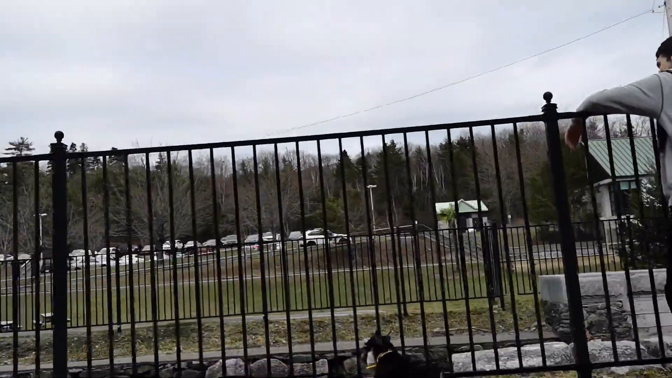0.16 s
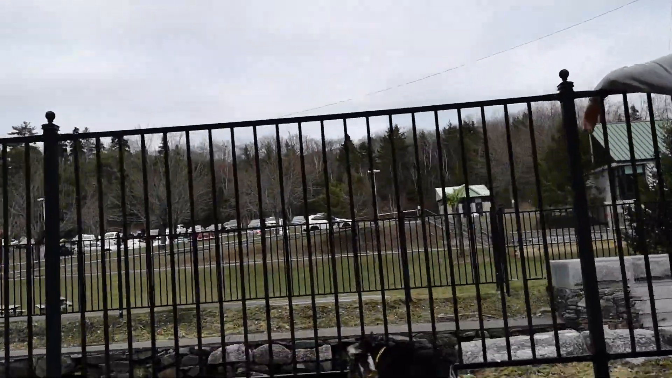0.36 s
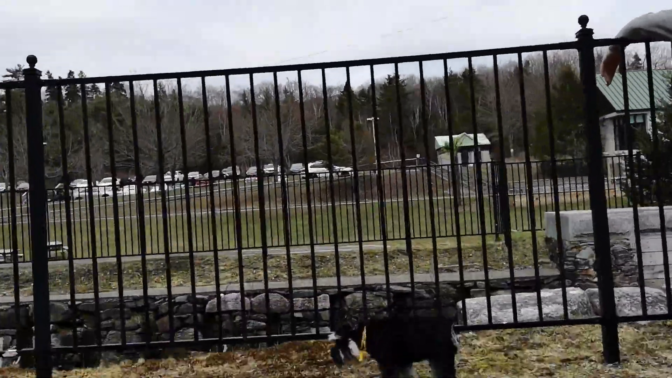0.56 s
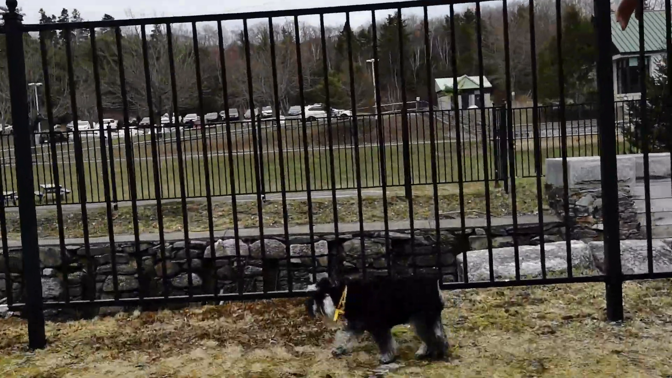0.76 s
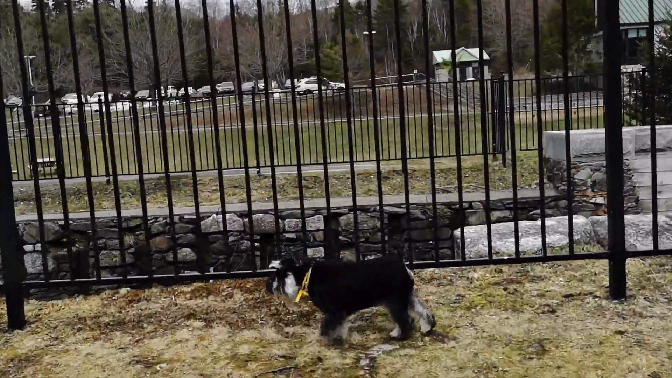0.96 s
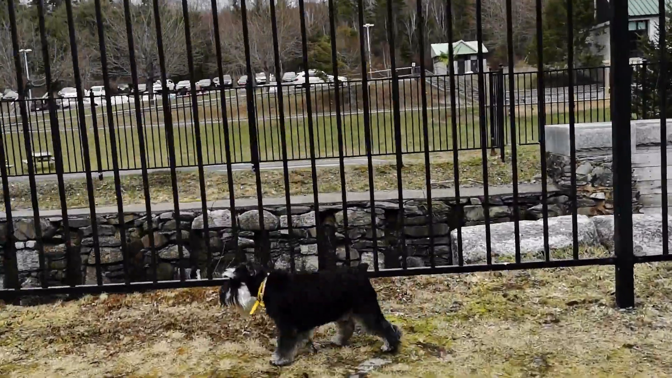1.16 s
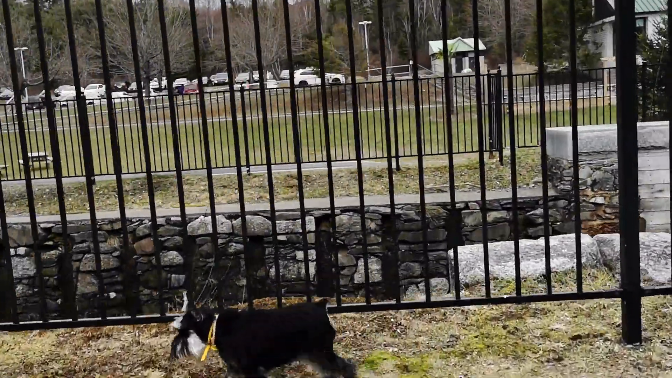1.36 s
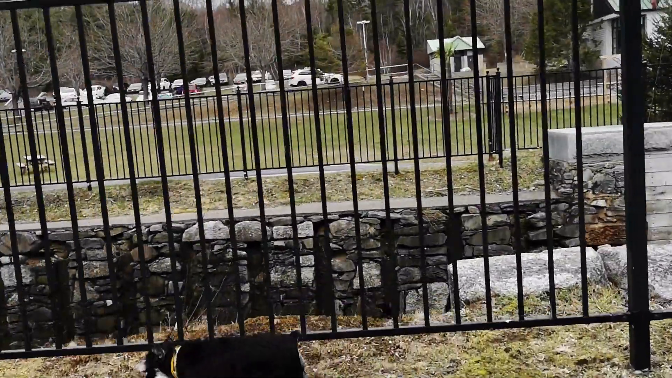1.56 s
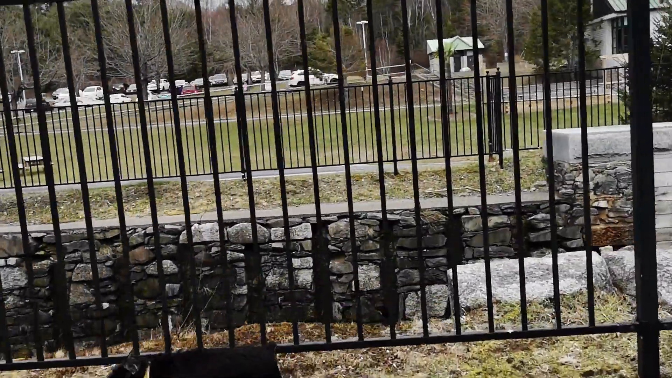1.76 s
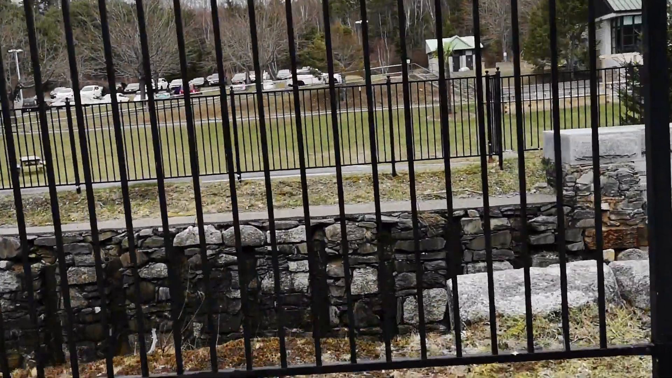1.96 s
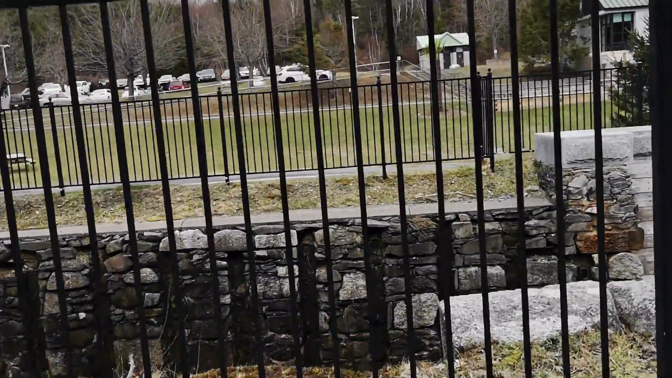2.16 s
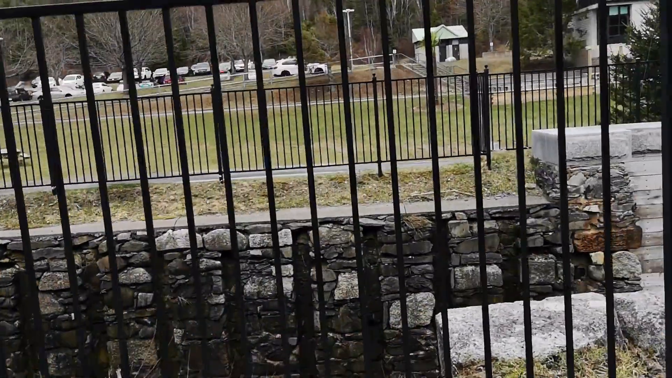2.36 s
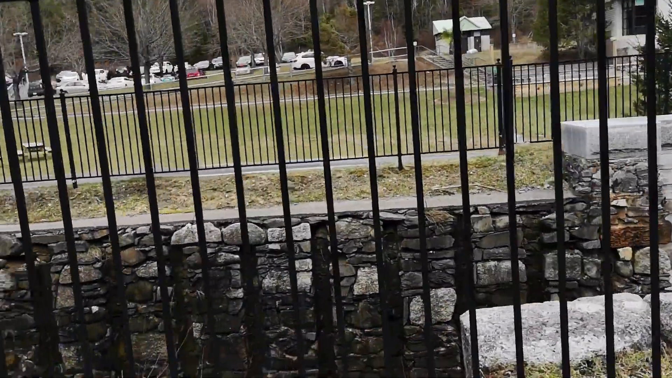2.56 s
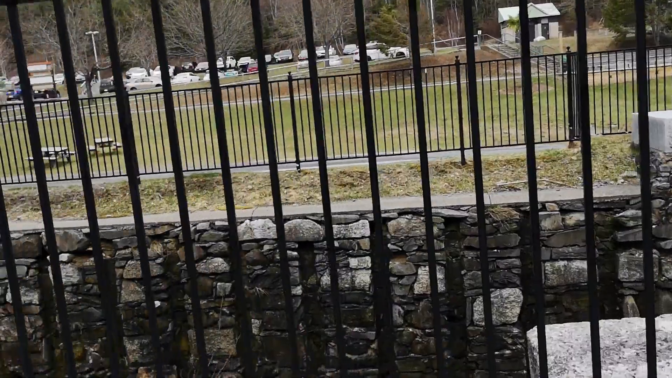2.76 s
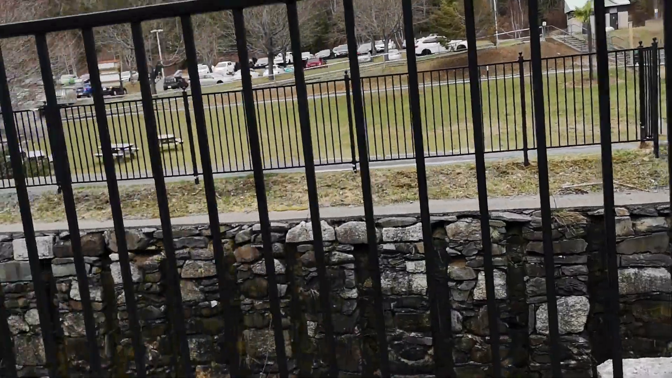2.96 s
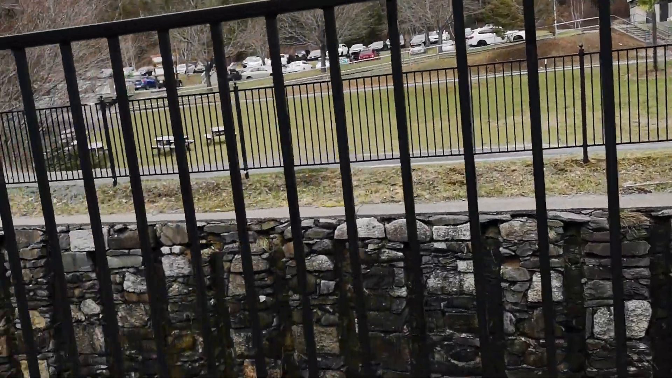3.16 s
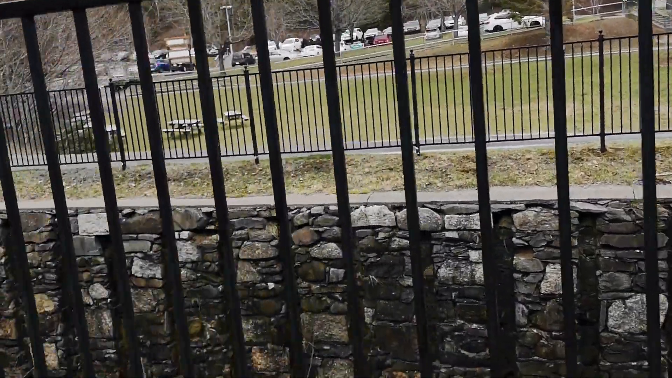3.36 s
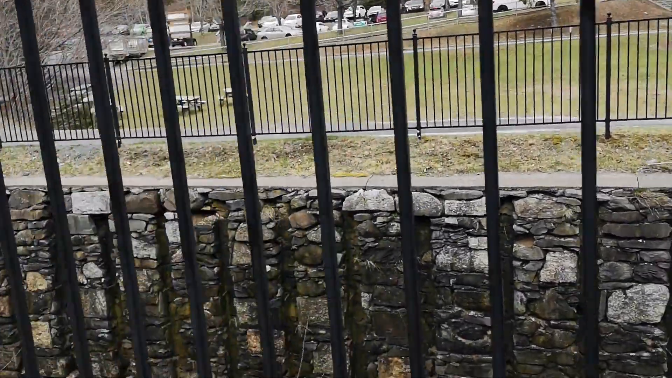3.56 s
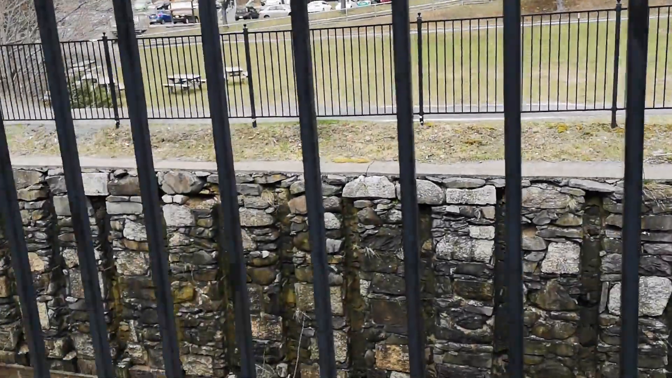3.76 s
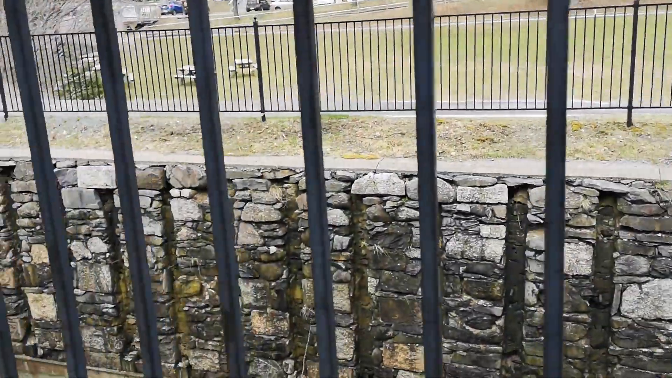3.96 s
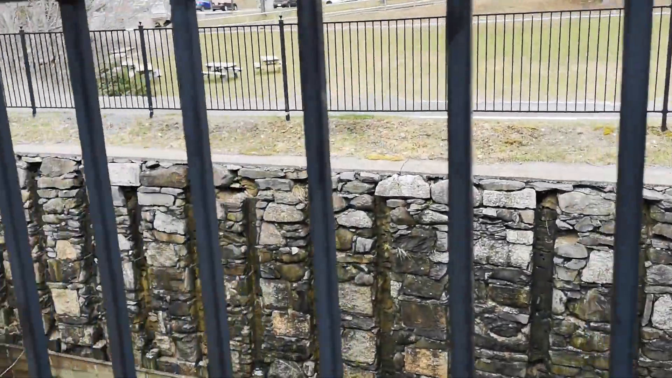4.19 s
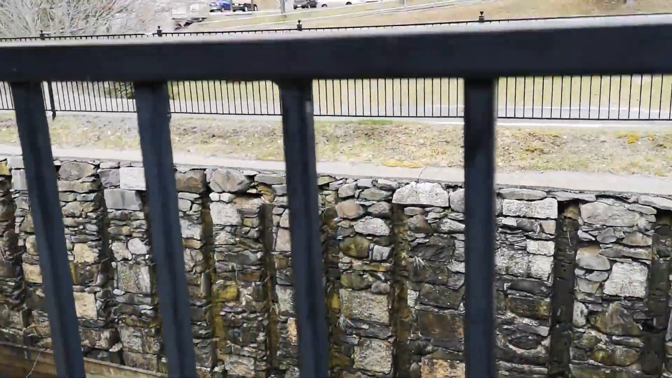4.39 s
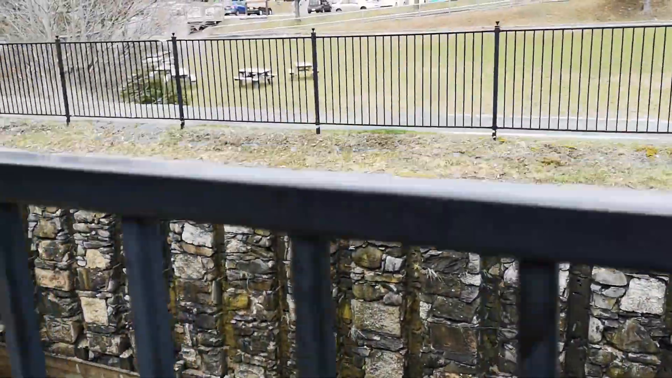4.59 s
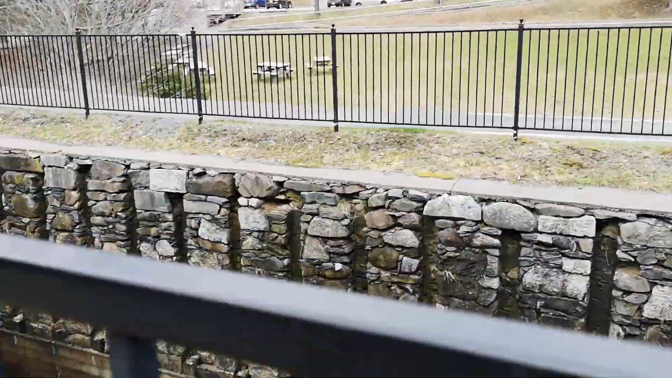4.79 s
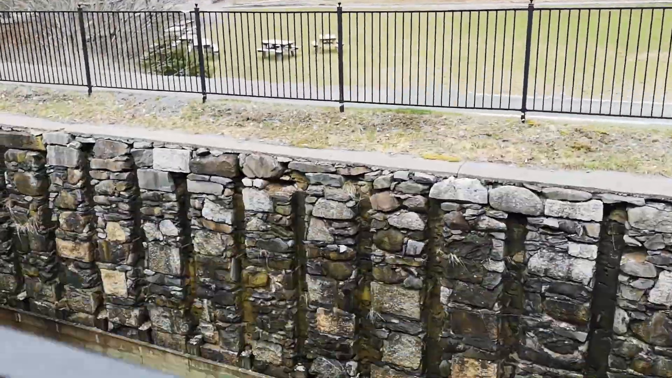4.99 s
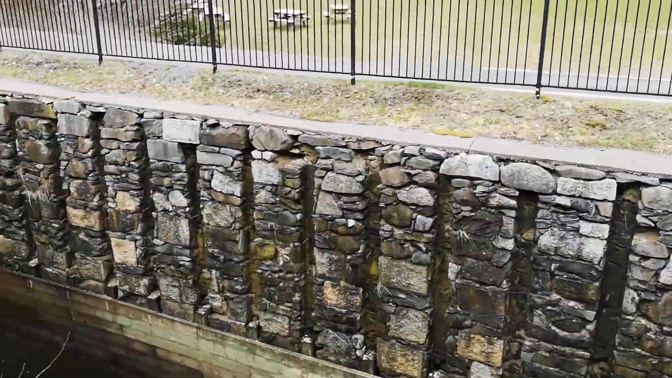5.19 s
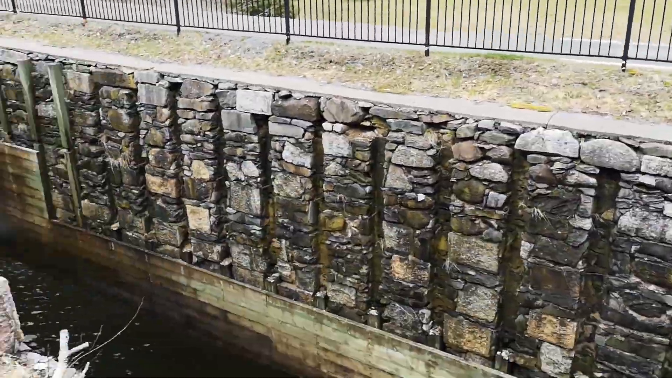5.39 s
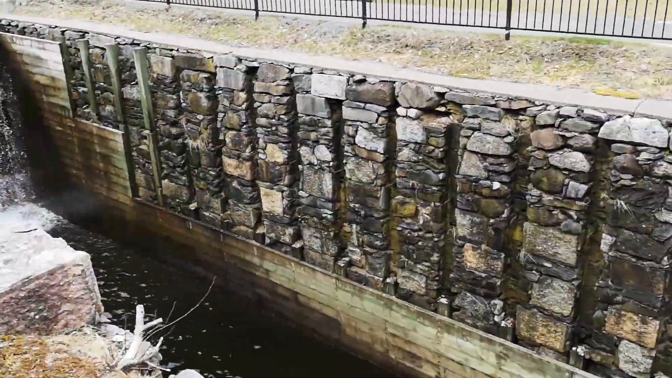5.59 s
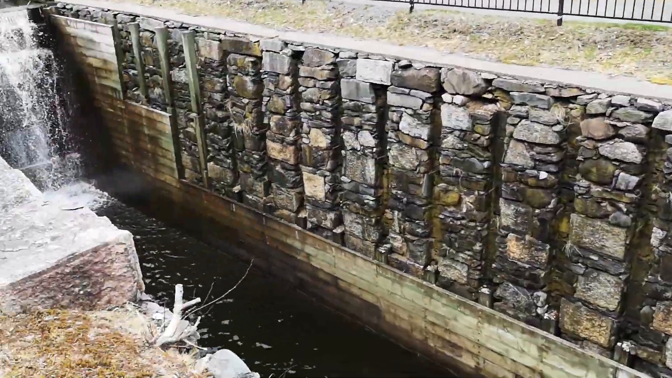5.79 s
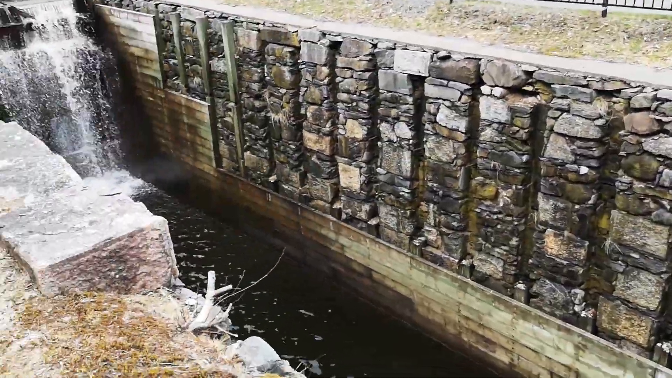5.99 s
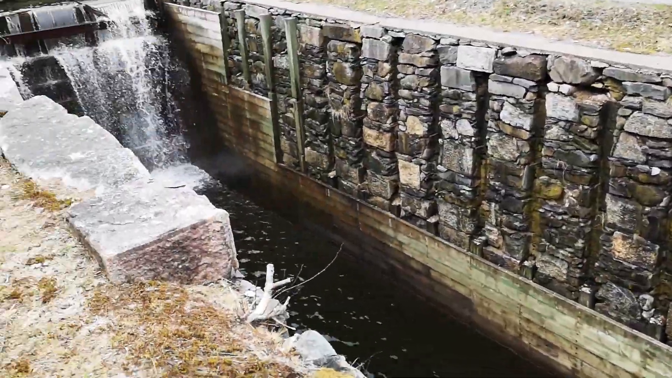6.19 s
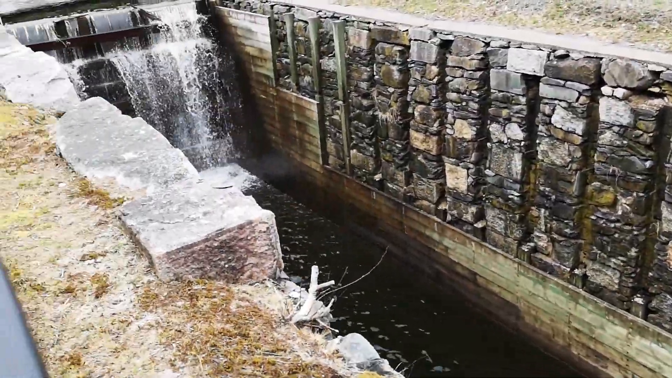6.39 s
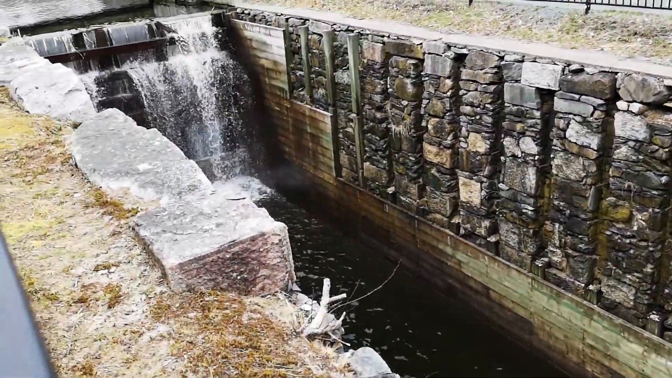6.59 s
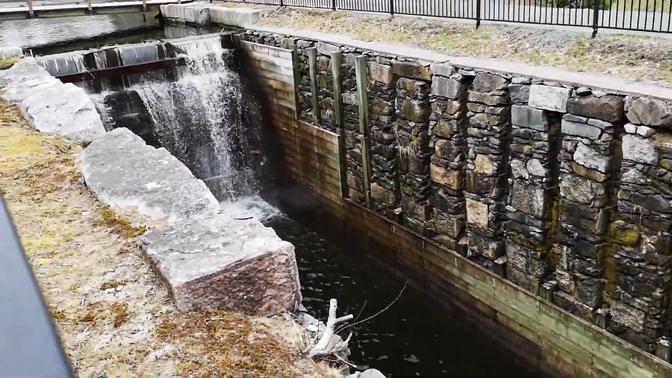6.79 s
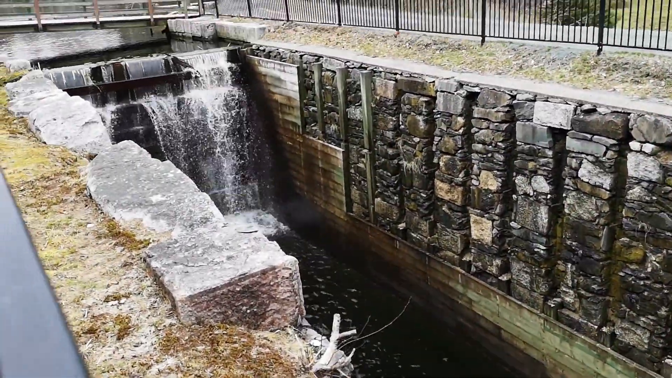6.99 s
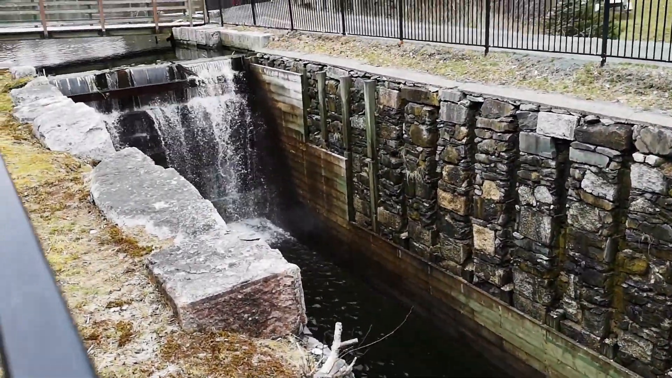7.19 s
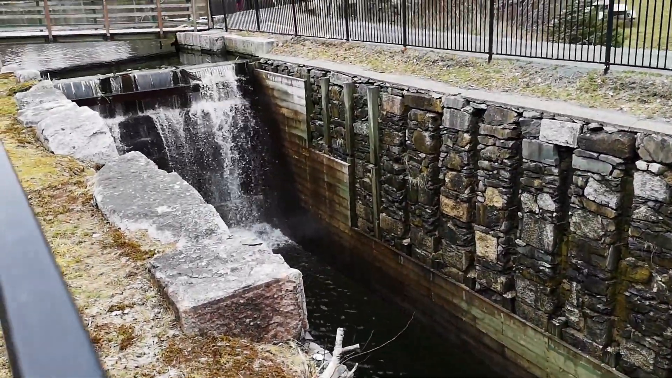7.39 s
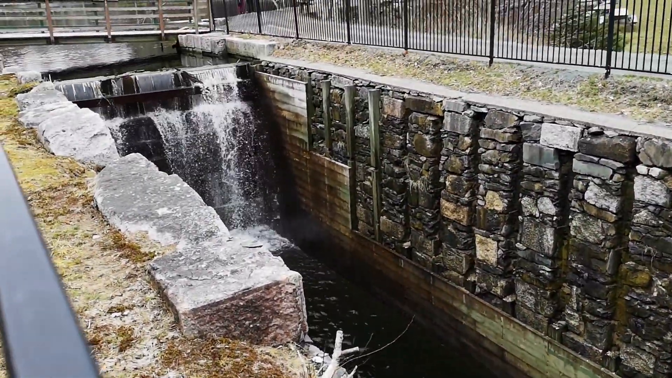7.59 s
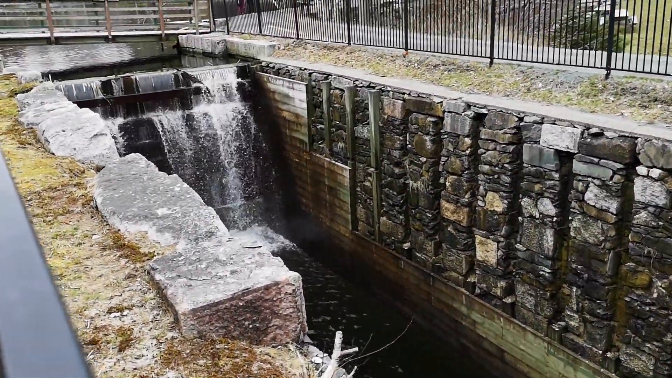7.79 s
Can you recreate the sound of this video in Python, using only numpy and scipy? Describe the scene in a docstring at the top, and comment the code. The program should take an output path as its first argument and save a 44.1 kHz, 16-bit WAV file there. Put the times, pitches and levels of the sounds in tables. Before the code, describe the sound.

A small waterfall pours continuously over a ledge into a stone-walled channel in an open park, heard in stereo from a moving handheld camera. At 0 s the rush is dulled by the bank and leans right; a short thin squeal, perhaps a bird, slides down within the first 0.2 s, off to the right, with a faint echo. A barely noticeable dull bump comes at 0.7 s. From 0 to 4 s the water steadily grows louder and clearer over a low plunging rumble. Around 4.4 s, passing the rail, the splash briefly takes on a coloured edge and moves towards the centre. By 4.8 s it is full, bright and hissing; a soft bump follows at 5.1 s. From about 6.2 to 7.4 s a gentle gust flutters low on the microphone. The dense splash, fine spray and bass throb continue steadily to the end near 7.8 s, without fading.

```python
"""Water rushes: a small waterfall rumbles, splashes and hisses, growing louder and brighter.
It pours over a ledge into a stone-walled channel while a camera walks up to the railing above it.
Shaped noise and swarms of short rings make splash and spray; low noise makes the plunge and a faint park.
A short falling squeal, perhaps a bird, is a sliding sine with an echo; a fluttering low noise is a soft gust.
Two quickly fading low sines, each with a rebound, are soft bumps on the camera."""
import sys
import numpy as np
from scipy import signal
from scipy.fft import rfft, irfft, next_fast_len
from scipy.io import wavfile
from scipy.ndimage import uniform_filter1d, map_coordinates

SR = 44100
rng = np.random.default_rng(int(sys.argv[2]) if len(sys.argv) > 2 else 0)


def persist_wave(psi):
    """Save psi, clipped to +-1, as 16-bit WAV."""
    counts = np.round(np.clip(psi, -1, 1) * 32767).astype(np.int16)
    wavfile.write(sys.argv[1], SR, np.atleast_2d(counts).T)


N = 346185  # length in samples

# Where the camera stands. Each row: time in seconds,
# place (0 behind the bank, 1 at the railing, 2 facing the fall).
CAMERA_PLACE = [(0, 0.019), (3.7, 0.11), (4.35, 0.88), (5.4, 1), (6.35, 1.91)]
# Tone of the splash from each place. Each row: frequency in Hz, left and right relative level in dB,
# left-right likeness from 0 to 1, lead of the left side in radians.
SPLASH_BEHIND_BANK = [(340, -13, -5, 1, 1.3), (440, -15, -6.5, 0.37, 2.5), (563, -10.5, -15.5, 1, 3.0),
                      (780, -6.5, -9.5, 0.32, 1.6), (990, -3.5, -3, 0.82, 1.73), (1307, -15, -5, 0.4, 3),
                      (1564, -4.5, -4.5, 0.55, 0.01), (1820, -4, 0, 0.26, -2.44), (2260, -6.5, -2, 0.55, 0),
                      (2580, -4.5, -3.5, 0.84, 1.87), (2820, -4, -3, 0.54, 2.5),
                      (3200, -8.5, -9.5, 0.2, -3), (3650, -9.5, -7.5, 0.32, -0.8),
                      (4710, -8.5, -9, 0.26, 2)]
SPLASH_AT_RAILING = [(340, -13, -8, 1, -0.1), (442, -15.5, -9, 0.23, 3.0), (568, -12, -17, 0.96, 3),
                     (785, -7.5, -13, 0.37, 1.1), (995, -4.5, -4, 0.98, 1.5), (1380, -9, -7, 0.3, -3.5),
                     (1640, -1.5, -4, 0.32, -1.1), (2010, 2.5, -4, 0.2, -1), (2330, -2, -2, 0.71, -0.5),
                     (2750, 0, -5.5, 0.53, 1.5), (3040, -6, -9.5, 0.28, 3), (3550, -6, -9, 0.22, -3.5),
                     (4070, -11, -7.9, 0.11, 0.1), (4820, -12, -11.5, 0.11, 2.5)]
SPLASH_FACING_FALL = [(340, -20, -4, 0.94, -2), (440, -12.5, -11.8, 0.35, -0.55), (640, -18, -18, 0.75, -3),
                      (863, -8.5, -5.5, 0.68, 0.5), (1240, -4, -5.5, 0.82, 1.27),
                      (1534, -13.5, -8, 0.18, 2.5), (1770, -5, -4.8, 0.46, 0.2),
                      (2040, -1.1, -0.5, 0.35, 1.93), (2270, 1, -5, 0.65, -3), (2730, -6, -9, 0.03, 1.5),
                      (2960, -7, -11.5, 0.43, -2), (3670, -11, -6.7, 0.33, -0.8),
                      (4160, -14.5, -9.5, 0.19, 2.5), (4800, -20, -15, 0.08, 1.5)]
# Tone of the spray from each place. Each row: frequency in Hz, left and right relative level in dB.
SPRAY_BEHIND_BANK = [(4800, -7.5, -5), (5900, -5.5, -1.5), (6460, -5.5, -6), (7750, -2, -0.5),
                     (8400, -3.5, -6), (9120, -8, -1.3), (9970, -20, -8.5), (11200, -21, -13.5),
                     (12800, -20, -18.5), (15000, -27, -25)]
SPRAY_AT_RAILING = [(4800, -7, -6), (5660, -15, -1), (6380, -9, -9.5), (7700, -2, -2.5), (8300, -6.5, -6),
                    (9260, -9.5, -4), (9940, -25, -9.5), (11200, -27, -16), (12800, -22, -21.5),
                    (15000, -30, -23)]
SPRAY_FACING_FALL = [(4800, -9, -11.5), (5800, -17, -7.5), (6500, -8.8, -9.5), (7740, -3, -3.5),
                     (8140, -5.5, -6), (8960, -16, -1), (10130, -17, -10), (11250, -29, -10),
                     (12800, -22, -19), (15000, -25, -21)]
# Drifting band of the splash that the channel walls reflect.
# Each row: time in seconds, centre in Hz, boost in dB.
WALL_REFLECTION = [(0, 1950, .5), (2.2, 2170, 3), (4.0, 2260, 2), (4.8, 2550, 1), (5.35, 2650, 2.2),
                   (6.3, 2100, -1), (7.85, 1920, 2)]
# Tone of the distant park. Each row: frequency in Hz, relative level in dB.
PARK_TONE = [(150, -25), (400, -8.5), (620, -2.5), (800, 0), (1200, -23), (5000, -6.5), (12000, -50)]
# Tone of the plunge. Each row: frequency in Hz, relative level in dB.
PLUNGE_TONE = [(11, -35), (18, -7), (32, -5), (60, 0.5), (86, -1), (155, -5), (189, -6), (327, -11.5),
               (382, -14), (439, -17.5), (520, -24), (680, -54), (1140, -120)]
# How alike the plunge is on both sides. Each row: frequency in Hz, likeness from 0 to 1.
PLUNGE_LIKENESS = [(60, 1), (170, 0.97), (260, 0.92), (350, 0.83), (450, 0.26)]
# Tone of the wind on the camera. Each row: frequency in Hz, relative level in dB.
WIND_TONE = [(8, -16), (25, 0.5), (45, -12), (80, -16.5), (150, -24), (400, -60)]
# Soft bumps on the camera. Each row: start in seconds, level before fading in dB, pitch in Hz.
CAMERA_BUMPS = [(.658, -32, 70), (5.12, -23.5, 125)]
# Balance as the camera swings. Each row: time in seconds, splash left minus right in dB,
# spray left minus right in dB.
CAMERA_AIM = [(0.2, -5.5, -4.0), (0.42, -4, -2.0), (2.2, -3, -1.5), (3.81, -3, 0), (4.42, 1, 2),
              (4.59, 2.0, -0.5), (6.03, 0.5, 0.0), (6.84, 0.5, -4), (7.6, 0.5, -3)]
# Puffs within the gust. Each row: time of the crest in seconds, level in dB.
WIND_PUFFS = [(6.3, -33), (6.45, -37), (6.67, -32), (6.88, -30), (7.0, -29.5), (7.18, -38), (7.42, -38)]
# Slow heaving of the deep throb. Each row: time in seconds, level change in dB.
PLUNGE_HEAVE = [(0, -1), (.9, 1), (2.1, -1), (3.6, 1.1), (4.9, -2.5), (5.75, 0.9), (6.7, 0.5), (7.85, 0.5)]

SPLASH_HZ, SPRAY_HZ = 380, 4800  # where the splash starts, where the spray takes over
TOP_HZ = 15200  # the camera's band limit
ARRIVE_S = 4.83  # the camera reaches the railing

# Base level of each layer, and how much the bank takes from it at the start: short waves lose most
SPLASH_DB, SPLASH_SHADOW_DB = -30.5, 9.5
SPRAY_DB, SPRAY_SHADOW_DB = -32, 8.5
BODY_DB, BODY_SHADOW_DB = -45.5, 5.5
DEEP_DB, DEEP_SHADOW_DB = -40, 1.6
FINE_HZ, FINE_SHADOW_DB = 12000, -3.5  # the finest hiss bends least over the bank
FACING_DB = 2.5  # the spray comes into full view as the camera turns to face the fall

# The top rail passes close by, reflects one band of the splash and one of the spray, then screens the spray
RAIL_S, RAIL_PASS_S = 4.36, 0.25
RAIL_SPLASH_HZ, RAIL_SPLASH_DB, RAIL_SPRAY_HZ, RAIL_SPRAY_DB = 2180, 4, 7800, 3
SCREEN_S, SCREEN_HALF_S, SCREEN_DB = 4.65, 0.24, -1.5
# The bounce off the lawn cancels part of the middle range; the dip slides down and fades during the walk
LAWN_HZ, LAWN_SLIDE_HZ_PER_S, LAWN_DIP_DB, LAWN_FADE_S = 1300, 170, -4, 1.6

GUST_S, GUST_HALF_S, GUST_DB = 6.7, .48, -37.5
PUFF_ATTACK_S, PUFF_DECAY_S = 0.023, 0.036
# The squeal holds, then sags and fades; midway it cracks into a rough, lower strand
SQUEAL_HZ, SAG_HZ_PER_S = 2010, 1850
SQUEAL_DB, SQUEAL_HOLD_S, SQUEAL_RELEASE_S = -39.5, .04, 0.14
CRACK_S, CRACK_HALF_S, CRACK_DB = 0.057, 0.019, -37


def waterfall():
    """Splash and spray surge together; reflections off lawn, walls and rail dull or lift single bands."""
    place, = curves(CAMERA_PLACE)
    splash_pan, spray_pan = curves(CAMERA_AIM)
    wall_hz, wall_db = curves(WALL_REFLECTION)
    surge_db = 0.2 * wobble(2.32) + .14 * wobble(9.1)
    splash_db = SPLASH_DB - SPLASH_SHADOW_DB * shadow() + surge_db
    facing = np.clip(place - 1, 0, 1)
    spray_db = SPRAY_DB - SPRAY_SHADOW_DB * shadow() + FACING_DB * facing + surge_db
    spray_db = spray_db + SCREEN_DB * swell(SCREEN_S, SCREEN_HALF_S)

    walked_s = np.minimum(np.arange(N) / SR, ARRIVE_S)
    dip_hz = LAWN_HZ - LAWN_SLIDE_HZ_PER_S * walked_s
    dip_db = LAWN_DIP_DB * np.exp(-walked_s / LAWN_FADE_S)
    pool = emphasised(splash(splash_db, splash_pan), dip_hz, dip_db, width_hz=620)

    # walls and rail reflect from straight ahead, so they lift only what both sides share
    rail = swell(RAIL_S, RAIL_PASS_S)
    ahead = pool.mean(axis=0)
    lifted = emphasised(ahead, wall_hz, wall_db, width_hz=280)
    lifted = emphasised(lifted, RAIL_SPLASH_HZ, RAIL_SPLASH_DB * rail, width_hz=210)

    mist = emphasised(spray(spray_db, spray_pan), RAIL_SPRAY_HZ, RAIL_SPRAY_DB * rail, width_hz=900)
    mist = emphasised(mist, FINE_HZ, FINE_SHADOW_DB * shadow(), width_hz=5300)
    return pool - ahead + lifted + mist


def splash(level_db, pan_db):
    """Churning foam and ringing bubbles in the pool, coloured by the channel walls and the camera body."""
    ringing = bubbles(598, 5000, cycles=13.6, rise=0.18, spread_db=0.5, count=9000, size=400)
    ringing = amp(-13.5) * ringing

    def heard(view):
        """The splash from one place; the part both sides share reaches one of them late."""
        # likeness and lead become one complex number, so that they can be read between rows
        lagged = [(hz, alike * np.cos(lead), alike * np.sin(lead)) for hz, _, _, alike, lead in view]

        def shared(hz):
            return np.dot([1, 1j], along(lagged, hz))

        def colour_and_lag(hz):
            colour = amp(along(view, hz)[:2]) * below(SPLASH_HZ, hz) * below(hz, SPRAY_HZ)
            lead = np.unwrap(np.angle(shared(hz)))
            return colour * np.exp(np.outer([.5j, -.5j], lead))

        water = blend(churn(patchy_db=0.48) + ringing, lambda hz: abs(shared(hz)))
        return filtered(water, colour_and_lag)

    views = (SPLASH_BEHIND_BANK, SPLASH_AT_RAILING, SPLASH_FACING_FALL)
    return approach([heard(view) for view in views], level_db, pan_db)


def spray(level_db, pan_db):
    """Fine drops hiss and tick on stone and water, with separate hiss on each side."""
    ticks = amp(-12) * bubbles(4230, 15400, cycles=4, rise=0.092, spread_db=0.5, count=16000, size=56)

    def heard(view):
        """The spray from one place."""
        drops = churn(patchy_db=0.5) + ticks
        return filtered(drops, lambda hz: amp(along(view, hz)) * below(SPRAY_HZ, hz))

    views = (SPRAY_BEHIND_BANK, SPRAY_AT_RAILING, SPRAY_FACING_FALL)
    return approach([heard(view) for view in views], level_db, pan_db)


def churn(patchy_db):
    """Two noises with brief patches of random gain: the sheet of water breaks into clumps."""
    spectrum = signal.stft(rng.standard_normal((2, N)), nperseg=512)[2]
    patches = rng.standard_normal(spectrum.shape[1:])
    patches = uniform_filter1d(patches, size=14, axis=0)  # smooth over frequency
    patches = uniform_filter1d(patches, size=10, axis=1)  # smooth over time
    patchy = spectrum * amp(patchy_db * unit(patches))
    return unit(signal.istft(patchy, nperseg=512)[1][:, :N])


def bubbles(low_hz, high_hz, cycles, rise, spread_db, count, size):
    """A swarm of damped sines, each rising in pitch and reaching the two sides with its own phase."""
    when, pitch, strength, lag = rng.random((count, 4)).T[:, :, None]
    hz = low_hz * (high_hz / low_hz) ** pitch
    turns = hz * np.arange(size) / SR
    age = turns / cycles  # 1 when the ring has lost 40 dB
    # small bubbles die sooner, so they start higher to be heard in the rush
    height = hz / high_hz * amp(-spread_db * np.log(1 - .99 * strength))
    ring = height * amp(-40 * age) * (1 - np.exp(-2 * turns))
    phase = 2 * np.pi * turns * (1 + rise * np.minimum(age, 1) / 2)
    at = ((when * N).astype(int) + np.arange(size)).ravel()

    def side(offset):
        """All rings added up at their own times."""
        return np.bincount(at, (ring * np.sin(phase + offset)).ravel(), N)[:N]

    return unit(np.array([side(0), side(2 * np.pi * lag)]))


def approach(views, level_db, pan_db):
    """Fades at equal power from the sound at one place to the next, and sets its level and balance."""
    place, = curves(CAMERA_PLACE)
    pair = 0
    for k, view in enumerate(views):
        share = np.sqrt(np.clip(1 - abs(place - k), 0, 1))
        pair = pair + share * np.array([unit(side) for side in view])
    sides = amp([pan_db / 2, -pan_db / 2])
    return pair * amp(level_db) * sides / np.sqrt(np.mean(sides ** 2, axis=0))


def shadow():
    """How much the bank hides the fall: 1 at the start of the walk, 0 at the railing."""
    return np.clip(1 - np.arange(N) / SR / ARRIVE_S, 0, 1)


def plunge(split_hz=175):
    """Clouds of air driven under the pool throb in the bass, almost alike on both sides."""
    heave_db, = curves(PLUNGE_HEAVE)
    deep_db = DEEP_DB - DEEP_SHADOW_DB * shadow() + heave_db + .25 * wobble(26)
    body_db = BODY_DB - BODY_SHADOW_DB * shadow()
    pair = blend(rng.standard_normal((2, N)), lambda hz: along(PLUNGE_LIKENESS, hz)[0])
    throb = filtered(pair, lambda hz: amp(along(PLUNGE_TONE, hz)) * below(hz, SPLASH_HZ))
    deep = filtered(throb, lambda hz: below(hz, split_hz, order=4) ** 2)
    # the bank screens the shorter waves more, and they come from the right
    body = unit(throb - deep) * amp([[-.8], [.8]])
    return amp(deep_db) * unit(deep) + amp(body_db) * body


def squeal(lower_ratio=.885, echo_db=-4, t60=0.73, echo_s=.13, pan_db=-10, rough=0.87):
    """A whistle with a rougher, lower strand holds, then slides down, off to the right, and echoes."""
    t = np.arange(N) / SR
    falling_s = np.maximum(t - SQUEAL_HOLD_S, 0)
    phase = 2 * np.pi * np.cumsum(SQUEAL_HZ - SAG_HZ_PER_S * falling_s) / SR
    envelope = np.clip(1 - falling_s / SQUEAL_RELEASE_S, 0, 1)
    upper = amp(SQUEAL_DB + 2.5 * wobble(70)) * envelope * np.sin(phase + rough * wobble(250))
    crack = amp(CRACK_DB) * swell(CRACK_S, CRACK_HALF_S)
    lower = crack * np.sin(lower_ratio * phase + 1.2 * wobble(300))
    tone = upper + lower

    # the park's walls are far off, so their answer comes late
    age = t[:SR // 2]
    fade = np.exp(-np.log(1000) * age / t60)  # t60: seconds to lose 60 dB
    tail = rng.standard_normal((2, len(age))) * fade * (age > echo_s)
    echo = signal.fftconvolve(tone[None], tail / np.linalg.norm(tail[0]), axes=1)[:, :N]
    return (tone + amp(echo_db) * echo) * amp([[pan_db / 2], [-pan_db / 2]])


def wind(apart_db=-20):
    """One soft gust flutters on the camera; each puff rises fast and dies away, nearly alike on both sides."""
    t = np.arange(N) / SR
    puffs = 0
    for crest_s, db in WIND_PUFFS:
        distance = np.maximum((crest_s - t) / PUFF_ATTACK_S, (t - crest_s) / PUFF_DECAY_S)
        puffs = puffs + amp(db) * np.exp(-distance)
    eddies = rng.standard_normal(N) + amp(apart_db) * rng.standard_normal((2, N))
    flutter = unit(filtered(eddies, lambda hz: amp(along(WIND_TONE, hz)[0])))
    gust = amp(GUST_DB) * swell(GUST_S, GUST_HALF_S)
    return (gust + puffs) * amp(.6 * wobble(18)) * flutter


def bumps(t60=0.058, rebound_s=.033, rebound_db=-7):
    """Each bump is a dull push that dies within a few cycles, then a softer rebound."""
    t = np.arange(N) / SR
    total = np.zeros(N)
    for start_s, db, hz in CAMERA_BUMPS:
        for late_s, loss_db in [(0, 0), (rebound_s, rebound_db)]:
            age = np.maximum(t - start_s - late_s, 0)
            thud = np.sin(2 * np.pi * hz * age) * np.exp(-np.log(1000) * age / t60)
            total += amp(db + loss_db) * thud
    return total


def park(level_db=-52):
    """A faint, even wash of distant traffic and trees, made of shaped noise."""
    wash = filtered(rng.standard_normal((2, N)), lambda hz: amp(along(PARK_TONE, hz)[0]))
    return amp(level_db + 0.15 * wobble(1.56)) * unit(wash)


def amp(db):
    """Gain of a level in dB."""
    return 10 ** (np.asarray(db) / 20)


def unit(x):
    """Scales x to an average (rms) strength of 1."""
    return x / np.sqrt(np.mean(x ** 2) + 1e-20)


def along(rows, hz):
    """Each column after the frequency, read on a log axis."""
    f, *cols = np.transpose(rows)
    return [np.interp(np.log(hz + 1), np.log(f + 1), c) for c in cols]


def curves(rows):
    """One value per sample for each column after the time."""
    s, *cols = np.transpose(rows)
    return [np.interp(np.arange(N) / SR, s, c) for c in cols]


def wobble(rate):
    """A smooth curve through random points, rate points a second."""
    points = rng.standard_normal(int(N * rate / SR) + 4)
    return map_coordinates(points, [np.arange(N) * rate / SR])


def swell(centre_s, half_s):
    """A bell in time, 1 at its centre."""
    return np.exp(-((np.arange(N) / SR - centre_s) / half_s) ** 2)


def filtered(x, response):
    """Multiplies the spectrum of x by a response to frequency."""
    m = next_fast_len(N + 8192, True)
    return irfft(rfft(x, m) * response(np.fft.rfftfreq(m, 1 / SR)), m)[..., :N]


def below(hz, edge_hz, order=10):
    """Gain of a steep low-pass; with the two frequencies swapped, of the matching high-pass."""
    return 1 / np.sqrt(1 + ((hz + 1) / (edge_hz + 1)) ** (2 * order))


def blend(pair, likeness):
    """Mixes two sounds into left and right; for unrelated sounds, likeness(Hz) sets how alike they are."""
    def weights(hz):
        turn = np.arccos(np.clip(likeness(hz), 0, 1)) / 2
        return np.array([np.cos(turn), np.sin(turn)])

    mid, side = filtered(pair, weights)
    return np.array([mid + side, mid - side])


def emphasised(x, centre_hz, boost_db, width_hz):
    """Lifts or lowers a narrow band of x whose centre may glide."""
    carrier = np.exp(2j * np.pi * np.cumsum(centre_hz * np.ones(N)) / SR)
    # shift the band down to 0 Hz, keep only what is slow, then shift it back
    low_pass = signal.butter(1, width_hz / 2, fs=SR, output="sos")
    band = signal.sosfiltfilt(low_pass, x / carrier)
    return x + (amp(boost_db) - 1) * 2 * np.real(band * carrier)


def scene():
    """The fall and the small sounds around the camera."""
    return waterfall() + plunge() + squeal() + wind() + bumps() + park()


def record(dry):
    """The camera keeps nothing above its band limit."""
    return filtered(dry, lambda hz: hz < TOP_HZ)


dry = scene()
out = record(dry)
persist_wave(out)
```